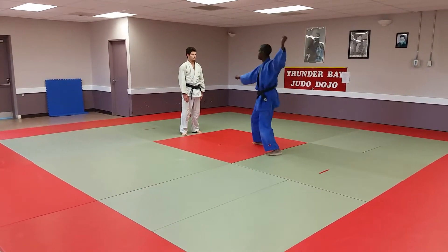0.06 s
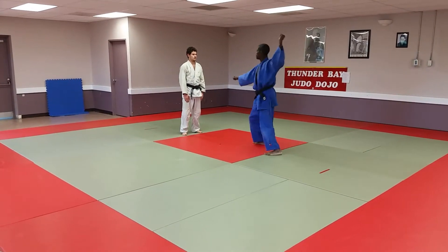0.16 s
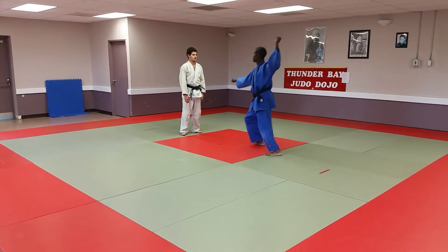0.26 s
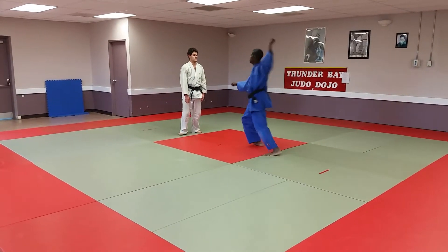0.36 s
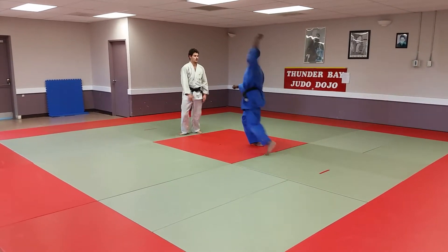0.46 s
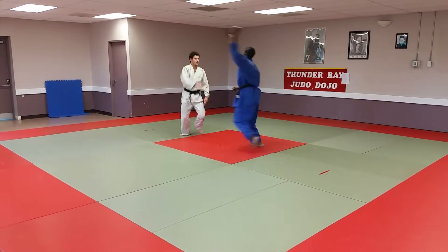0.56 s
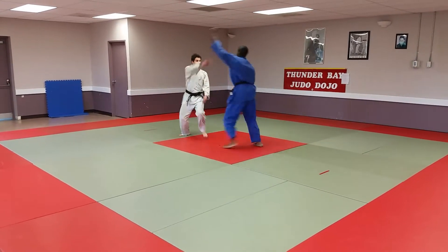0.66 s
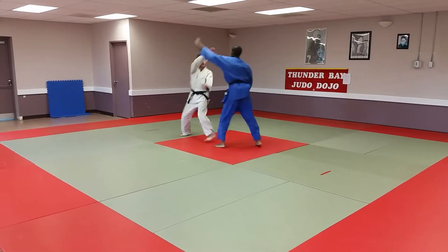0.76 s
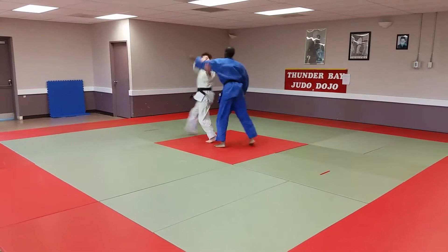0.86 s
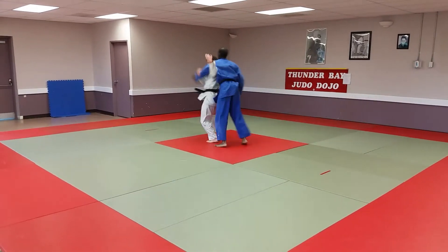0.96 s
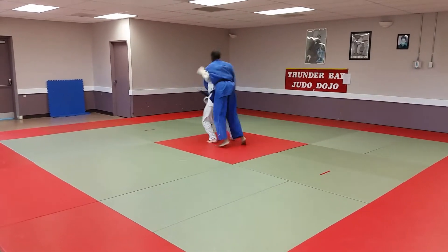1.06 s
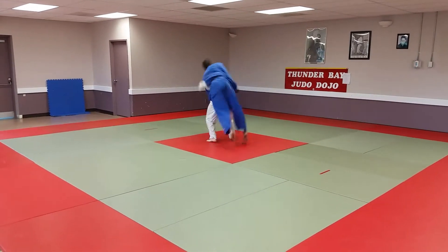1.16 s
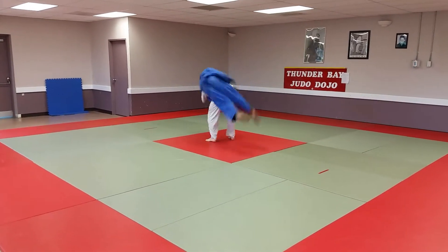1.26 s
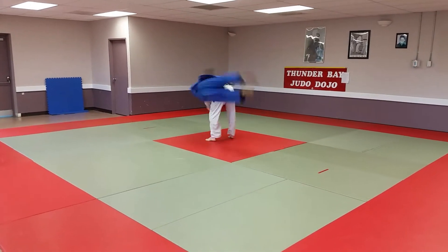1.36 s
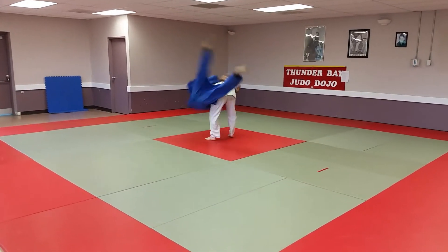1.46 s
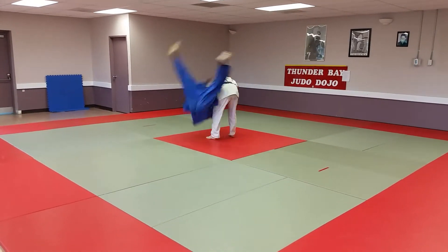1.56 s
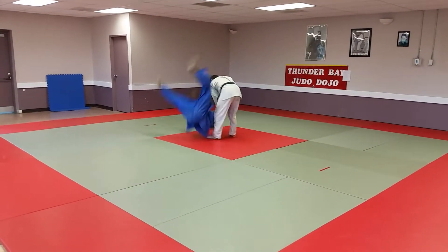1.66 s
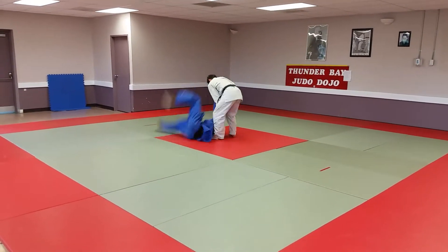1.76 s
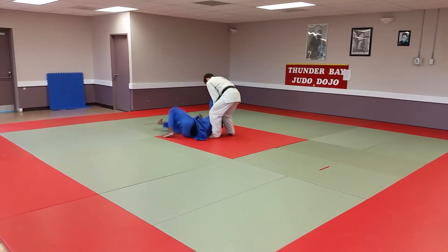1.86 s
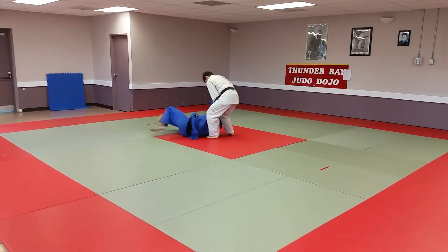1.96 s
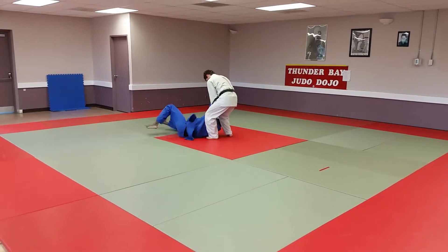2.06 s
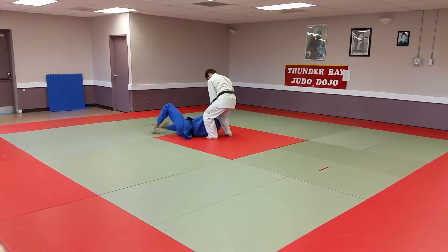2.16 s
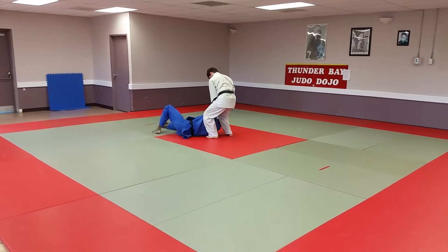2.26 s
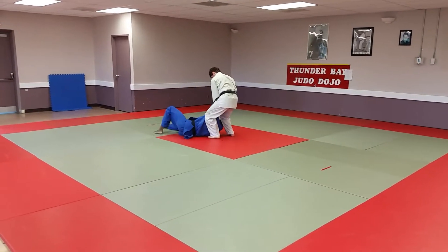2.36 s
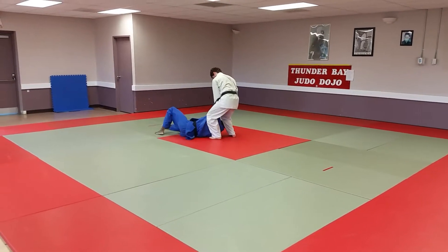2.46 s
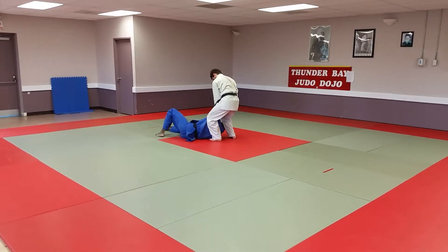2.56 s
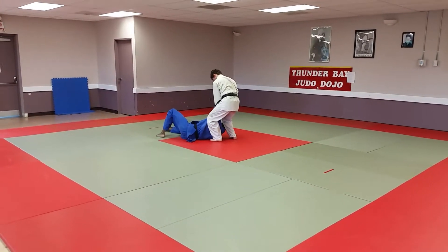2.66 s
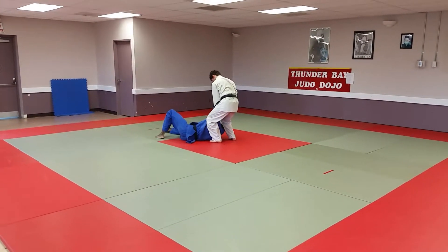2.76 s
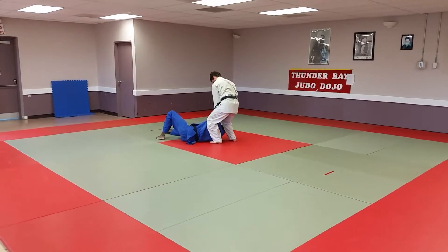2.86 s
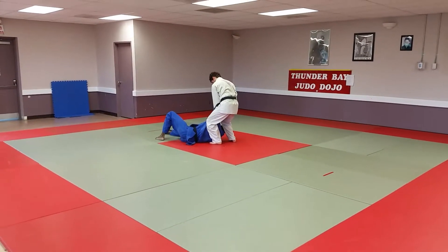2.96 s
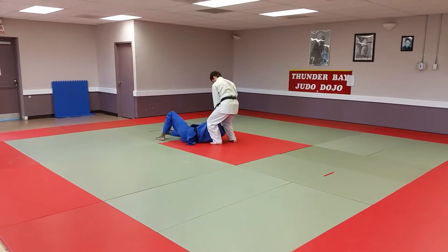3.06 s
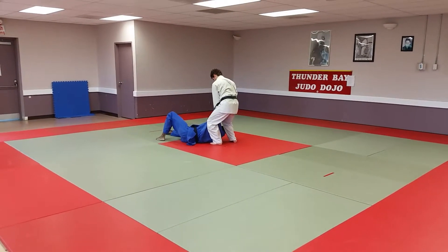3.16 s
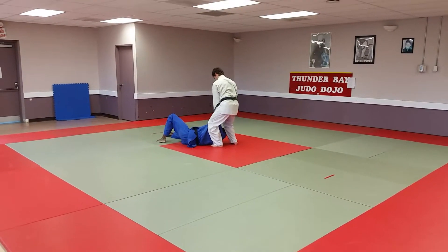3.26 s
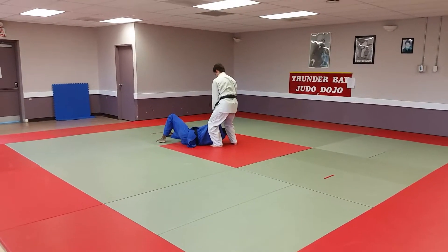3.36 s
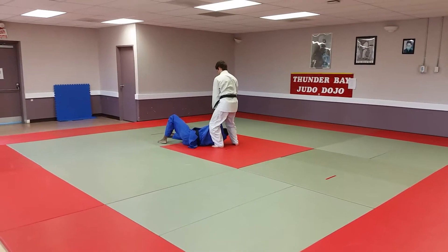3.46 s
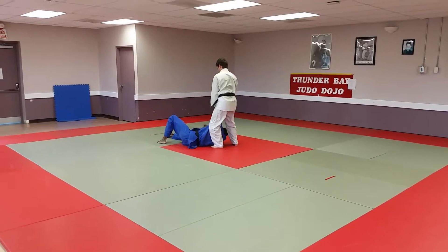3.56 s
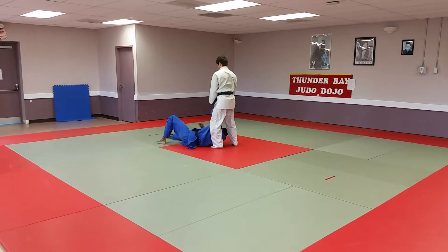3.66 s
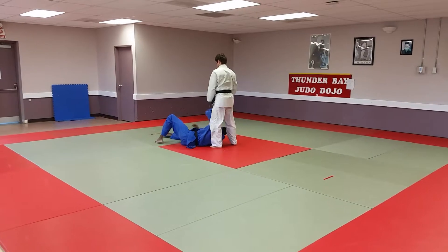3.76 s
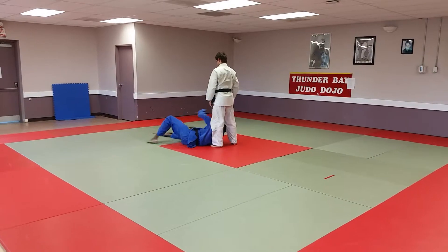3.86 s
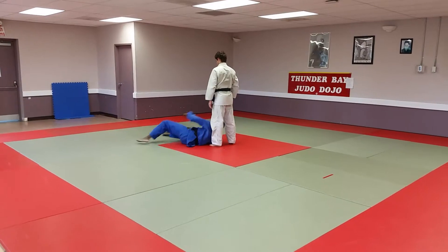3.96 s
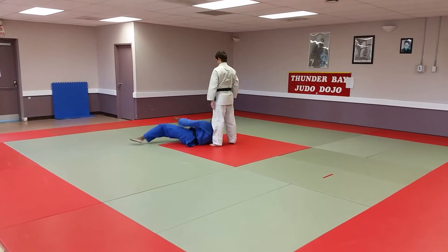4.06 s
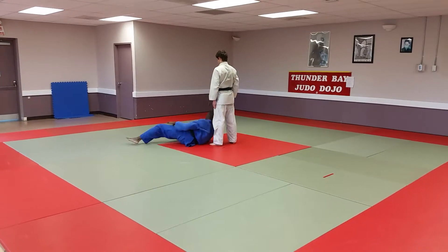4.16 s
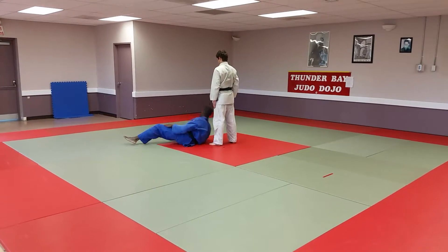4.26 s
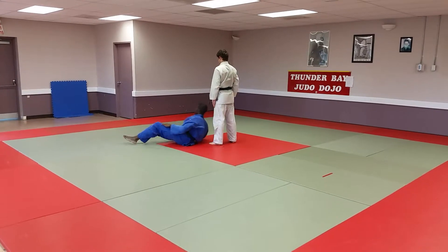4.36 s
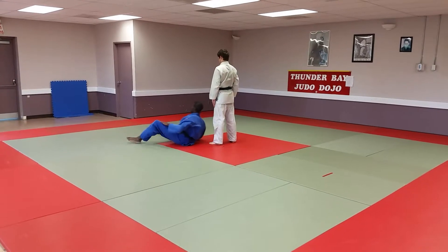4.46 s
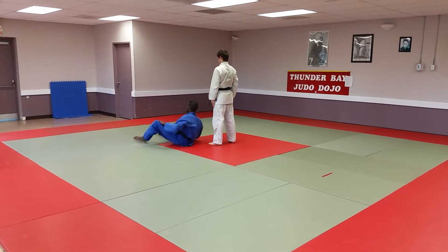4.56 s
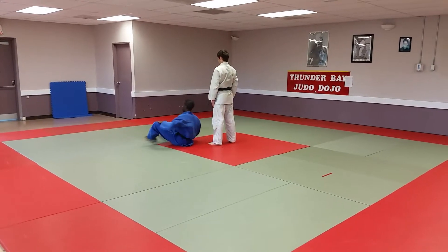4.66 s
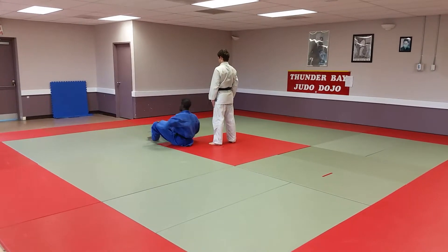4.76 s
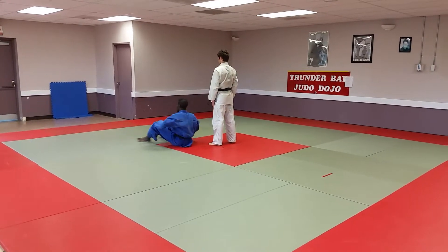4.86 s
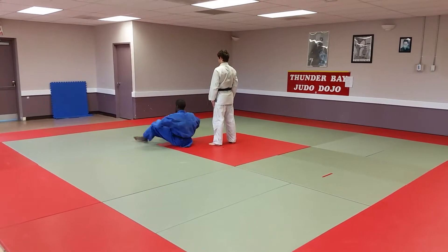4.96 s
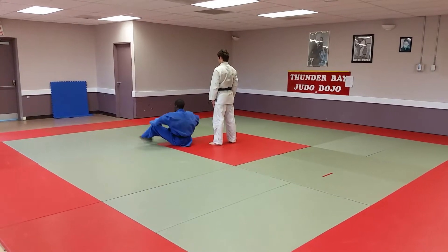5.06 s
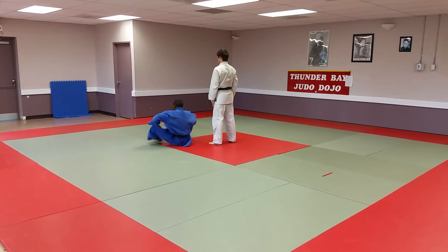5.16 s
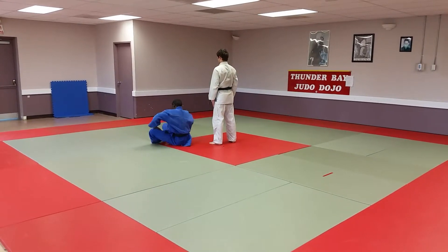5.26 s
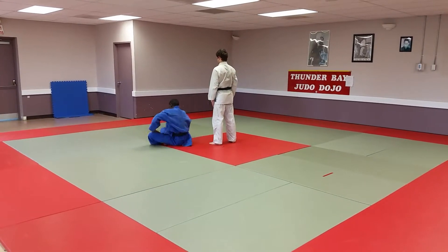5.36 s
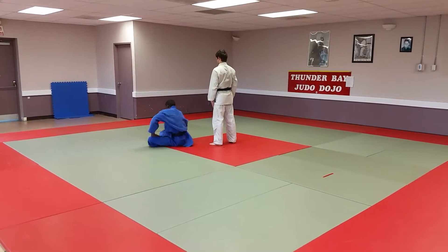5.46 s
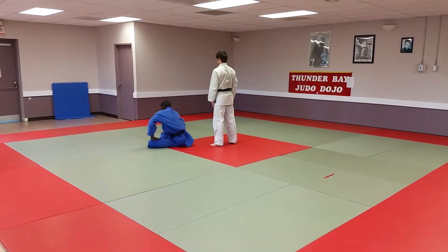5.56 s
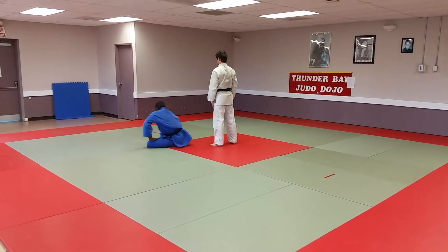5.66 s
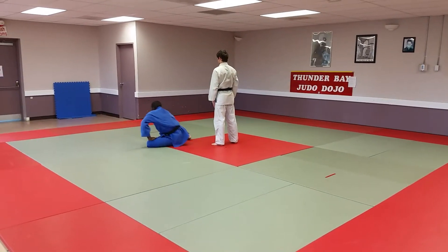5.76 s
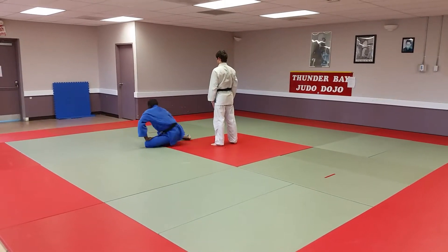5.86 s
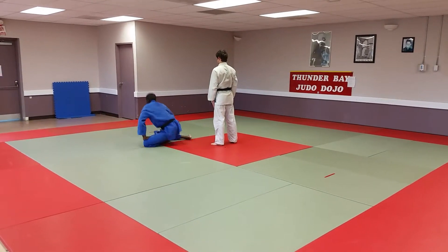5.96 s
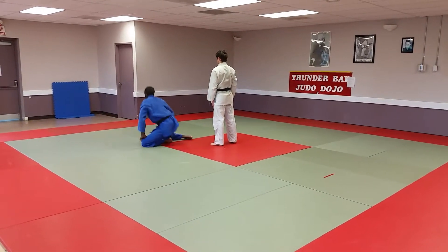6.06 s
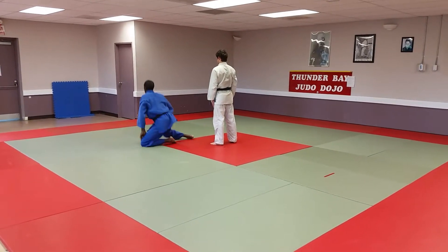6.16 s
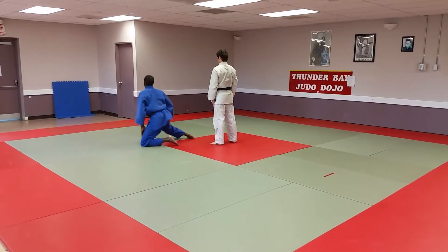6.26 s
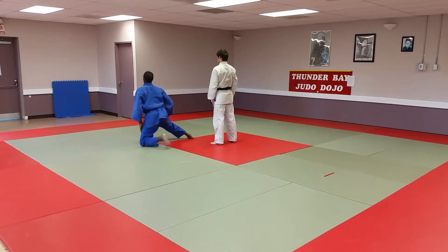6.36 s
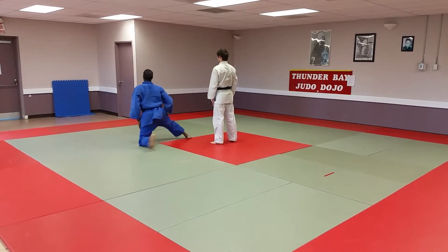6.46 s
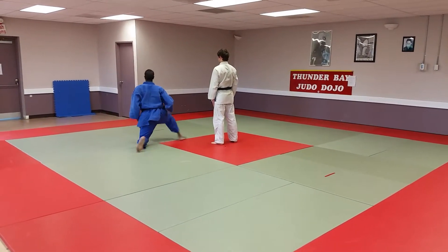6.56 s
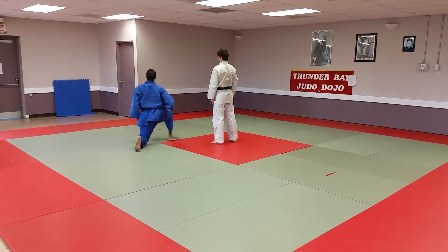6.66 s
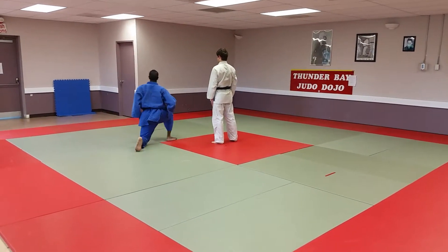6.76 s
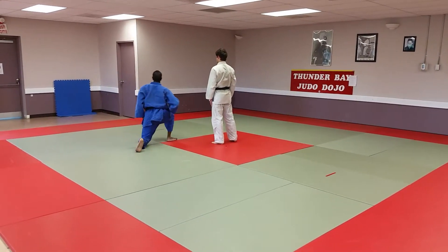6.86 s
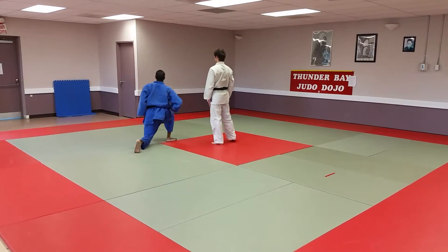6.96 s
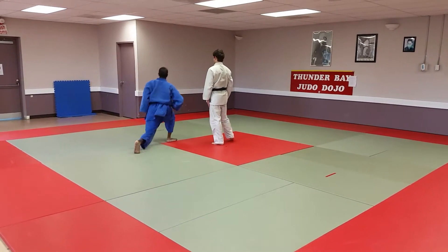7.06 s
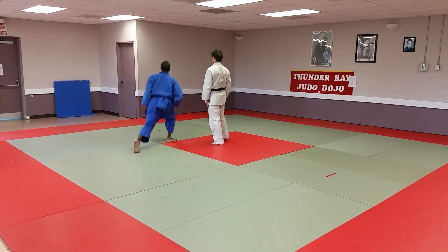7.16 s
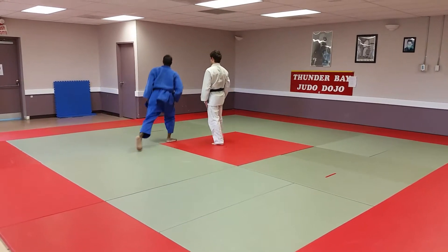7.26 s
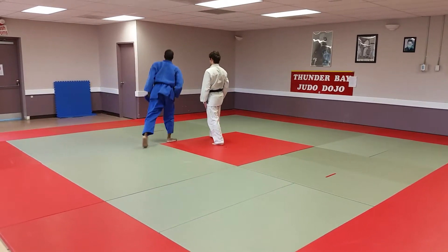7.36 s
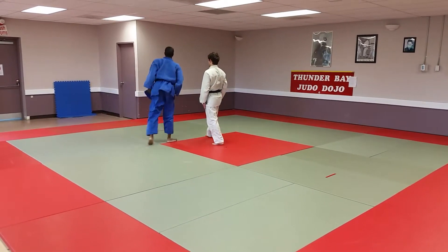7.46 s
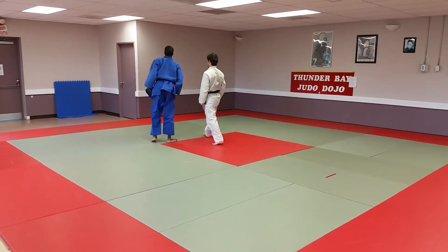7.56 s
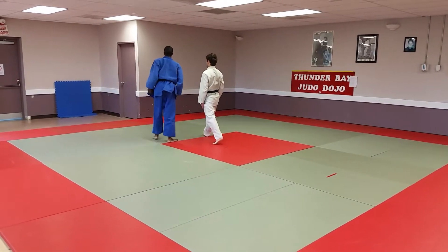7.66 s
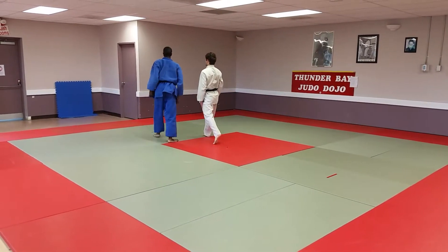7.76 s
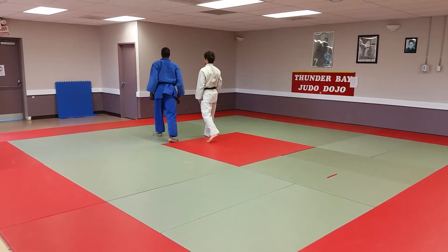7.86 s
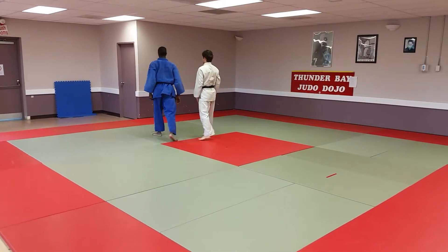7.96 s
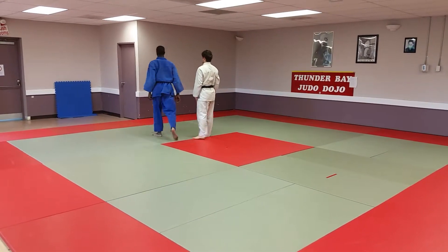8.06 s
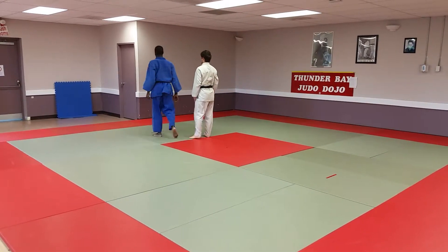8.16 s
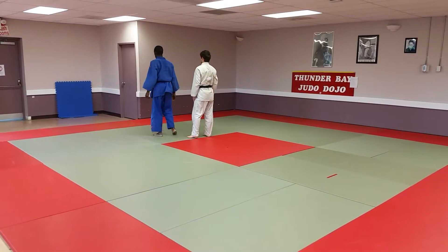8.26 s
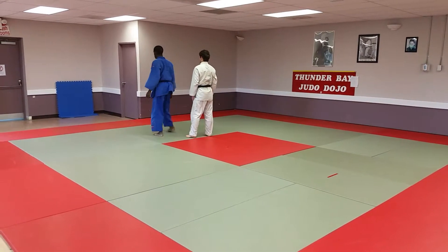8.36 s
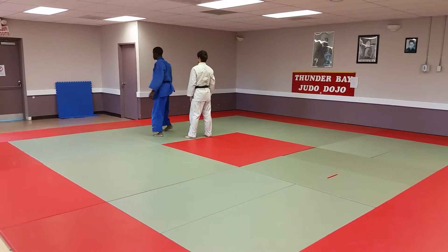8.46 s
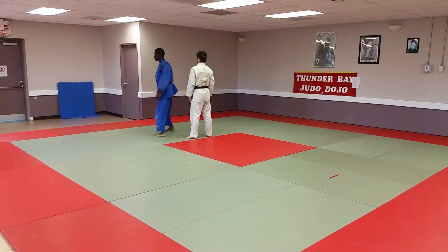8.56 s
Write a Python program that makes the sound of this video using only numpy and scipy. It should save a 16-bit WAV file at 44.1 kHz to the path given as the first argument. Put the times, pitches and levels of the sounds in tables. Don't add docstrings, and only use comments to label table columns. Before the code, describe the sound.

Feet scuff and heavy cotton rustles on vinyl mats, then a body booms onto a sprung floor, the hall rings briefly, and soft shuffling follows.

```python
import sys
import numpy as np
from scipy import signal
from scipy.fft import rfft, irfft, next_fast_len
from scipy.io import wavfile
from scipy.ndimage import uniform_filter1d, map_coordinates

SR = 44100
rng = np.random.default_rng(int(sys.argv[2]) if len(sys.argv) > 2 else 0)


def gain_from_db(level_db):
    decades = np.asarray(level_db, float) / 20
    return 10 ** decades


def generate_wav(signal):
    frames = np.transpose(np.atleast_2d(signal))
    scaled = np.clip(frames, -1, 1) * 32767
    pcm = np.round(scaled).astype(np.int16)
    wavfile.write(sys.argv[1], SR, pcm)


N = 380485

# frequency_hz, density_db (per Hz)
SLOW_SHEEN = [(2350, -36), (4000, -23.5), (5600, -13), (7660, -16.5), (9010, -0.5), (10700, 3),
              (15100, -9.5), (16000, -5)]
# frequency_hz, density_db (per Hz)
SLOW_DRAG = [(410, -39), (700, -6), (950, -9.5), (1860, 2), (3470, -5), (4120, 0.5), (5490, -1.5),
             (7600, -12), (8000, -10), (10400, -29), (17600, -120)]


def unit(x):
    return x / np.sqrt(np.mean(x ** 2) + 1e-20)


def along(points, hz):
    f, v = np.transpose(points)
    return np.interp(np.log(hz + 1), np.log(f + 1), v)


def wobble(rate):
    knots = rng.standard_normal(int(N * rate / SR) + 4)
    return map_coordinates(knots, [np.arange(N) * rate / SR])


def filtered(x, response):
    n = x.shape[-1]
    m = next_fast_len(n + 8192)
    return irfft(rfft(x, m) * response(np.fft.rfftfreq(m, 1 / SR)), m)[..., :n]


def spread(pair, spectrum):
    # frequency_hz, likeness (0 to 1)
    alike = [(60, .99), (200, 0.95), (400, 0.75), (700, 0.36), (1300, 0.11), (4000, 0.04)]

    def mid_side(hz):
        turn = np.arccos(np.clip(along(alike, hz), -1, 1)) / 2
        return gain_from_db(along(spectrum, hz)) * [np.cos(turn), np.sin(turn)]

    mid, side = filtered(pair, mid_side)
    return unit(np.array([mid + side, mid - side]))


def rush(spectrum, patchy_db, ridged_db=0):
    z = signal.stft(rng.standard_normal((2, N)), nperseg=512)[2]

    def smooth_field(bins, frames):
        field = rng.standard_normal(z.shape[1:])
        return unit(uniform_filter1d(uniform_filter1d(field, bins, 0), frames, 1))

    gain_db = patchy_db * smooth_field(6, 8) + ridged_db * smooth_field(2, 30)
    noise = signal.istft(z * gain_from_db(gain_db), nperseg=512)[1][:, :N]
    return spread(noise, spectrum)


def ring_out(spectrum, size):
    # frequency_hz, t60_s
    hall = [(60, 0.81), (250, 0.61), (1000, 0.46), (4000, 0.94), (12000, .4)]
    noise = spread(rng.standard_normal((2, size)), spectrum)
    hz, t, z = signal.stft(noise, SR, nperseg=512)
    decay = gain_from_db(-60 * t / along(hall, hz)[:, None])
    return signal.istft(z * decay, SR, nperseg=512)[1][:, :size]


def early(t, t60):
    # delay_s, level_db
    near_walls = [
        (0, 2),
        (.0028, -10),
        (.0075, -15.5),
        (0.011, -13),
        (.02, -17),
    ]
    copies = sum(gain_from_db(db - 60 * np.abs(t - s) / t60) * (t >= s) for s, db in near_walls)
    return copies + gain_from_db(-15) * (1 - np.exp(-t / 0.011))


def add(into, sound, s):
    i = round(s * SR)
    n = min(sound.shape[1], N - i)
    into[:, i:i + n] += sound[:, :n]


def stroke_db(s, rise, hold, fade):
    rise_db, stop_db_per_s, linger_db = 29, 351, -2.5
    t = np.arange(0, N / SR, .001) - s
    after = np.maximum(t - hold, 0)
    climb = rise_db * np.minimum(t, 0) / rise
    return climb + np.maximum(-stop_db_per_s * after, linger_db - fade * after)


def per_sample(x):
    return np.interp(np.arange(N) / SR, np.arange(len(x)) / 1000, x)


def air():
    # frequency_hz, level_db (rms)
    hum = [
        (120, -43.5),
        (206.4, -47.5),
        (480, -78),
    ]
    # frequency_hz, density_db (per Hz)
    rumble_spectrum = [(12, -38), (20, -10.5), (49, 7), (66, 3.5), (86, -3.5), (124, -4), (176, -5.5),
                       (206, -8), (238, -11.5), (274, -12.5), (321, -19.5), (356, -22), (390, -29.5),
                       (450, -36.5), (580, -64.5), (990, -120)]
    wash_spectrum = [(210, -17.5), (350, -5.5), (390, -8.5), (488, -8), (645, -10), (693, -13), (1150, -20),
                     (3000, -29), (3900, -64), (6600, -120)]
    hiss_spectrum = [(1470, -36.5), (2500, -16), (3040, -10), (3440, -7), (4170, 0), (7770, -30),
                     (9440, -17.5), (9810, -9.5), (10600, -8), (12000, 0), (13700, -10), (15000, -5),
                     (16000, -0.5)]
    # full_s, rise_s, hold_s, level_db
    scuffle = [
        (.58, 0.48, 0.063, -75.5),
        (1.063, 0.92, 0.21, -52.5),
        (1.6, 0.66, .2, -60),
        (1.904, 0.13, .16, -50),
        (6.603, 1, .15, -70.5),
    ]
    fall_s, sink_s, stay_s, creep_s = 1.673, 0.48, 0.54, 0.96
    t = np.arange(N) / SR
    duck = np.interp(t, np.cumsum([fall_s, sink_s, stay_s, creep_s]), [0, 1, 1, 0])

    tones = 0
    for hz, db in hum:
        phase = 2 * np.pi * hz * t + 0.14 * wobble(1.5)
        tones = tones + gain_from_db(db + 0.46 * wobble(3.4)) * np.sin(phase)
    rumble = rush(rumble_spectrum, patchy_db=0.8) + gain_from_db(39.5) * tones

    stirred = per_sample(sum(gain_from_db(db + stroke_db(s, rise, hold, fade=58)) for s, rise, hold, db in scuffle))
    wash_gain = gain_from_db(2.5) * (gain_from_db(-65 - 18.5 * duck) + stirred)
    wash = wash_gain * rush(wash_spectrum, patchy_db=1.3)
    hiss_db = -64.5 - 22 * duck - 1 * (t < fall_s)
    hiss = gain_from_db(hiss_db) * rush(hiss_spectrum, patchy_db=3.1)
    return gain_from_db(-37 - 8 * duck) * rumble + wash + hiss


def slides():
    # frequency_hz, density_db (per Hz)
    fast_sheen = [(2940, -42), (5000, -25), (5620, -18.5), (7750, -18), (8130, -6.5), (10000, 1.5),
                  (12100, 2), (13900, -7.5), (15200, -4.5), (16000, -12)]
    fast_drag = [(710, -55), (1200, -26.5), (1980, -17.5), (2550, -7), (2740, -12.5), (3090, -4.5),
                 (3620, -7.5), (5640, -3.5), (7220, -8), (8000, -5), (10400, -32), (17600, -120)]
    # full_s, rise_s, hold_s, sheen_db, drag_db (re sheen)
    throw = [(0.0, .01, 0.006, -43, -5), (.4, .28, 0.012, -50, -15.5), (.6, .2, 0.015, -53, -17),
             (.795, .03, 0.059, -34.5, -18), (.99, .25, 0.03, -39, -10), (1.16, 0.064, 0.02, -35.5, -16),
             (1.4, .3, 0.092, -58.5, -7.5), (1.64, 0.22, 0.095, -59, -11), (1.82, 0.18, .02, -54.5, -11),
             (1.875, 0.025, 0.19, -39, 1), (2.1, .1, 0.013, -42.5, -5)]
    rising = [(3.88, .5, .65, -71, -14), (3.92, .1, 0.055, -58, -17), (4.61, .11, .09, -50, -14.5),
              (4.8, .2, .08, -59, -22), (4.96, .15, .16, -41.5, -13), (5.17, .15, .13, -38, -12),
              (5.34, .1, 0.041, -43.5, -11.5), (6.31, .75, 0.044, -54.5, -23), (6.43, 0.21, .02, -44, -9),
              (6.65, 0.17, 0.12, -33.5, -11), (7.24, 0.225, 0.18, -50, -14.5), (7.47, 0.16, 0.12, -44, -15),
              (7.6, 0.1, 0.066, -35, -9), (7.66, .1, .3, -40, -5.5), (8.07, 0.06, .05, -41, -13.5),
              (8.22, 0.207, 0.064, -49.5, -9.5), (8.325, 0.028, 0.013, -21.5, -16),
              (8.385, 0.11, .06, -27, -8.5), (8.48, .2, .035, -25.5, -12)]
    slow_db, fast_db = -59.5, -23
    slow = rush(SLOW_SHEEN, patchy_db=1.9, ridged_db=1.9), rush(SLOW_DRAG, patchy_db=2.0, ridged_db=1.5)
    fast = rush(fast_sheen, patchy_db=1.4, ridged_db=2.0), rush(fast_drag, patchy_db=1.0, ridged_db=2.5)
    out = np.zeros((2, N))
    for strokes, pace in ((throw, .7), (rising, 1)):
        bright, dull = 0, 0
        for s, rise, hold, db, drag_db in strokes:
            bright = bright + gain_from_db(2 * (db + stroke_db(s, rise, hold, fade=98.5)))
            dull = dull + gain_from_db(2 * (db + drag_db + stroke_db(s, rise, hold, fade=78)))
        bright, dull = per_sample(bright), per_sample(dull)
        speed = pace * (10 * np.log10(bright + 1e-20) - slow_db) / (fast_db - slow_db)
        turn = np.clip(speed, 0, 1) * np.pi / 2
        sheen, drag = (np.cos(turn) * a + np.sin(turn) * b for a, b in zip(slow, fast))
        grip_db = 0.27 * wobble(45) + 0.53 * wobble(300)
        out += gain_from_db(3.0 + grip_db) * np.sqrt(bright) * sheen
        out += gain_from_db(1.5 + grip_db) * np.sqrt(dull) * drag
    return out


def blows():
    # start_s, peak_db, boom_hz
    hits = [(0.004, -22, 110), (0.039, -35, 131), (0.081, -36.5, 110), (1.059, -22, 200),
            (1.073, -22.5, 240), (1.187, -21, 121), (1.846, -22, 220), (1.852, -17, 152),
            (1.865, -4.5, 246), (1.884, -7, 245), (1.904, -8, 161), (1.924, -7, 182.8),
            (1.946, -4.5, 110.5)]
    # frequency_hz, density_db (per Hz)
    boom_spectrum = [(15, -46), (25, -8.5), (43, -1), (81, 1), (141, -6), (246, -1.5), (339, -11.5),
                     (408, -22), (442, -18), (600, -24), (780, -54.5), (1320, -120)]
    slap_spectrum = [(240, -33), (400, -1), (575, 10.5), (789, -3.5), (1080, 4), (1240, -18.5), (1390, 1),
                     (1510, -6), (2000, -12.5), (2320, -31.5), (4730, -27.5), (5060, -11.5), (6000, -30),
                     (7800, -56), (13200, -120)]
    after_spectrum = [(180, -32), (300, 2), (336, 2.5), (405, -13.5), (437, 0.5), (483, -15), (818, -10),
                      (962, -20), (1510, -19.5), (1690, -21), (2040, -23), (2590, -34), (6000, -32),
                      (7800, -57), (13200, -120)]
    settle_hz = 130, 250
    settle_s, gap_s, settle_db, loss_db_per_s = 1.962, .026, -9.5, 91.5
    events = [(*hit, -17) for hit in hits]
    for k in range(7):
        later = k * gap_s
        events.append((settle_s + later, settle_db - later * loss_db_per_s, settle_hz[k % 2], -19.5))

    out, t = np.zeros((2, N)), np.arange(SR // 2) / SR
    size = len(t)
    swell = 1 - np.exp(-t / 0.004)
    touch = 1 - np.exp(-(t / 0.0018) ** 2)
    for s, db, hz, slap_db in events:
        bend = np.sin(2 * np.pi * hz * t) * gain_from_db(-60 * t / 0.077) * (1 - np.exp(-t * hz / 0.065))
        boom = bend + gain_from_db(-13) * swell * ring_out(boom_spectrum, size)
        direct = touch * gain_from_db(-60 * t / 0.14) * ring_out(slap_spectrum, size)
        slap = direct + gain_from_db(-3) * swell * ring_out(after_spectrum, size)
        add(out, gain_from_db(db) * boom + gain_from_db(db + slap_db) * slap, s)
    return out


def sway():
    # deepest_s, peak_db, swing_hz
    swings = [
        (-.09, -12.5, 67.4),
        (1.941, -6, 78.4),
    ]
    gap_s, loss_db, backswing_db = 0.044, 3.5, -5.5
    out, t = np.zeros((2, N)), np.arange(SR // 4) / SR
    for deepest_s, peak_db, hz in swings:
        lump = np.sin(2 * np.pi * hz * t) * (t / 0.023) * np.exp(1 - t / 0.018)
        for k in range(-2, 5):
            s = deepest_s + k * gap_s
            db = peak_db - loss_db * abs(k) + backswing_db * (k % 2)
            if s >= 0:
                add(out, gain_from_db(db - 3.0) * np.array([lump, lump]), s)
    return out


def ticks():
    # start_s, peak_db, body_db (re snap)
    snaps = [(0.6006, -34, -14), (0.7806, -27, -26), (0.8068, -22, -18), (0.8974, -32, -7.5),
             (1.139, -28, -15), (1.1765, -23, -29.5), (1.8726, -22, -6.5), (1.8802, -13.5, -13),
             (1.8868, -11, -27), (1.8961, -15, -14), (1.925, -15, -12), (1.9577, -25.5, -13),
             (3.4296, -75, 1), (4.5516, -55.5, -25), (6.364, -39, -11), (7.1498, -42, -7.5),
             (7.211, -48, -30), (8.0521, -27.5, -36), (8.314, -20.5, -44)]
    out, t = np.zeros((2, N)), np.arange(SR // 3) / SR
    for s, db, body_db in snaps:
        snap = ring_out(SLOW_SHEEN, len(t)) + gain_from_db(body_db + 0.5) * ring_out(SLOW_DRAG, len(t))
        add(out, gain_from_db(db - 1.5) * early(t, t60=0.011) * snap, s)
    return out


def taps():
    # start_s, peak_db, knock_hz
    knocks = [(0.605, -42.5, 640), (0.898, -33.5, 1360), (0.945, -42, 686), (1.053, -29, 710),
              (1.177, -37.5, 554), (1.379, -38, 900), (1.432, -45, 466), (1.586, -37, 540),
              (1.629, -39.5, 457.6), (1.839, -25.5, 966), (1.853, -17, 600), (1.865, -13.5, 1080),
              (1.916, -17, 449), (2.004, -16, 501), (2.126, -37, 454), (6.36, -45, 541),
              (6.408, -44.5, 651)]
    head_on = .6
    out, t = np.zeros((2, N)), np.arange(SR // 3) / SR
    for s, db, hz in knocks:
        hollow = [(hz / 4, -40), (hz / 2.9, -9), (hz, 0), (hz * 1.6, -7), (2200, -16), (3200, -35), (9000, -70)]
        knock = ring_out(sorted(hollow), len(t))
        knock = head_on * knock[0] + (1 - head_on) * knock
        onset = 1 - np.exp(-t / 0.0033)
        add(out, gain_from_db(db + 2.0) * onset * early(t, t60=0.016) * knock, s)
    return out


def scene():
    return air() + slides() + blows() + sway() + ticks() + taps()


def roll_off(x):
    return signal.sosfilt(signal.butter(12, 16380, fs=SR, output="sos"), x)


def record(dry):
    # frequency_hz, left_re_right_db
    port_difference = [(60, -1.5), (92, 1), (140, -1.5), (210, -1.5), (330, -0.5), (500, -1), (770, -1),
                       (1170, -2), (1790, -0.5), (2740, 0), (4190, -3.5), (6410, -8), (9810, 9.5),
                       (15000, -3)]

    def response(hz):
        ports = gain_from_db(along(port_difference, hz) * [[.5], [-.5]])
        return ports * (hz < 15960) * hz ** 2 / (hz ** 2 + 23 ** 2)

    held = dry / (1 + np.abs(dry / .86) ** 6) ** (1 / 6)
    return roll_off(filtered(held, response) - .0006)


dry = scene()
out = record(dry)
generate_wav(out)
```